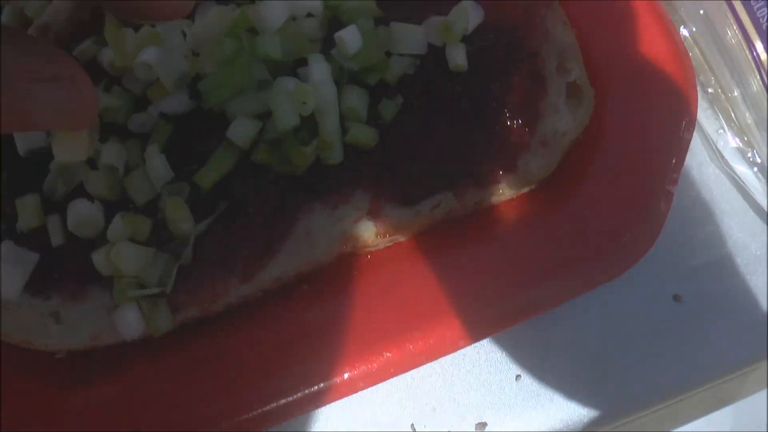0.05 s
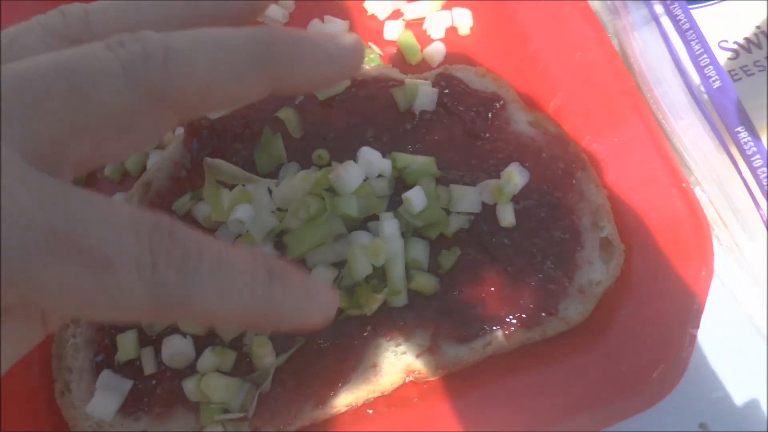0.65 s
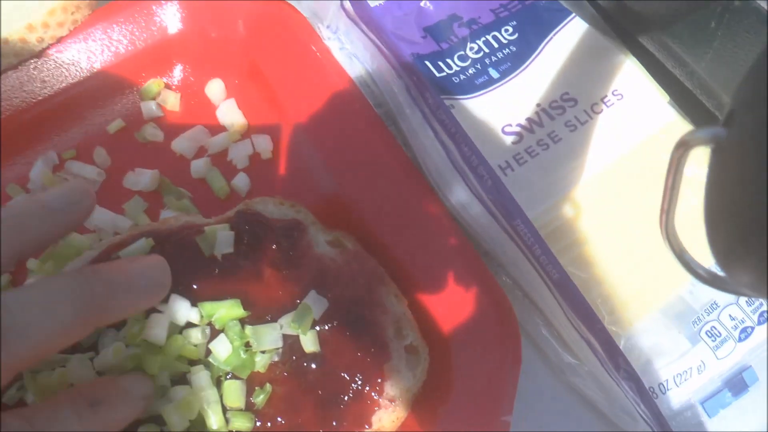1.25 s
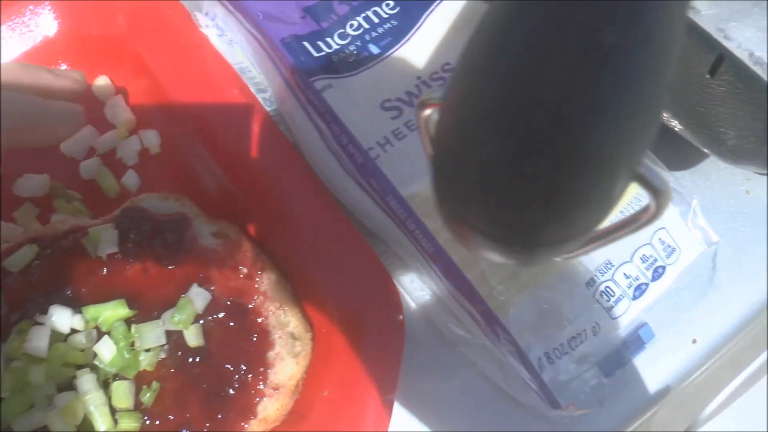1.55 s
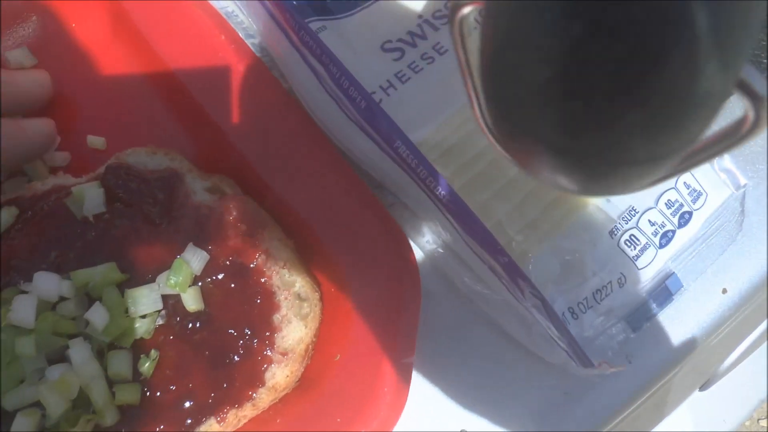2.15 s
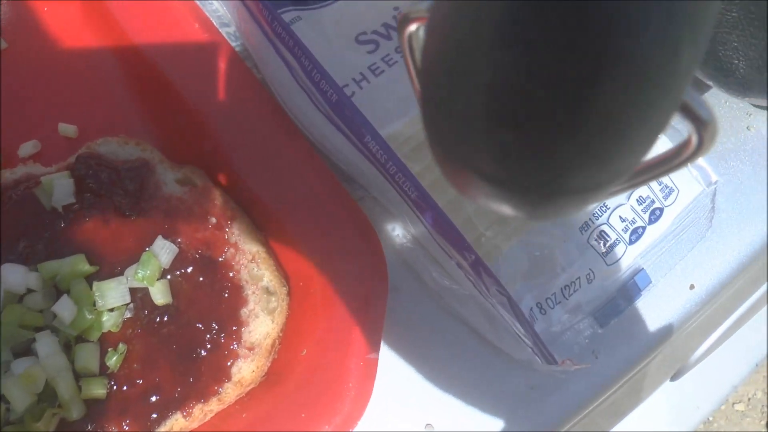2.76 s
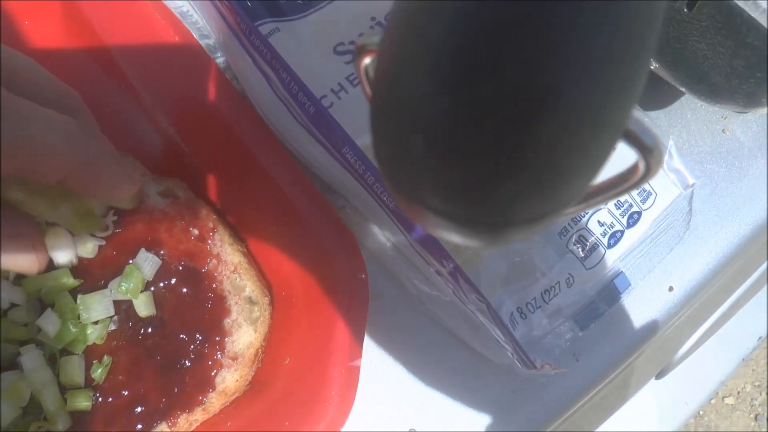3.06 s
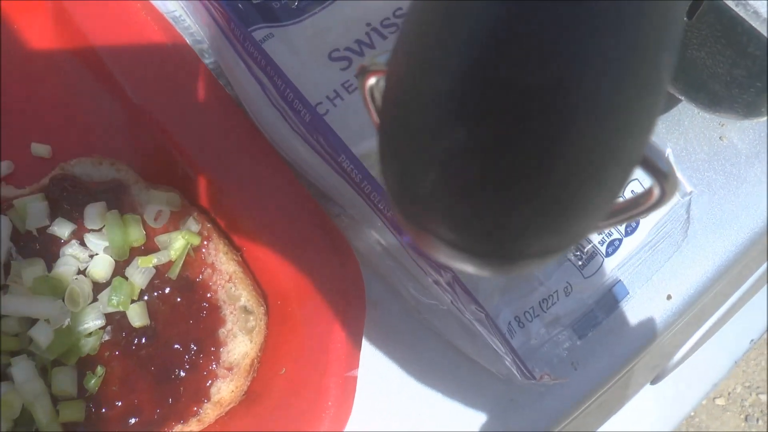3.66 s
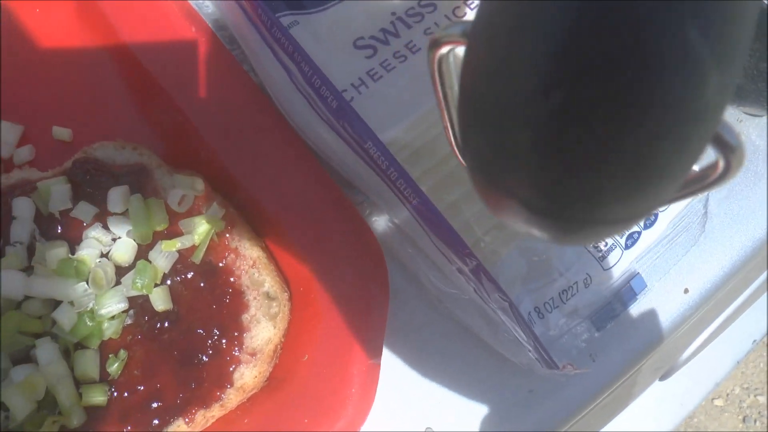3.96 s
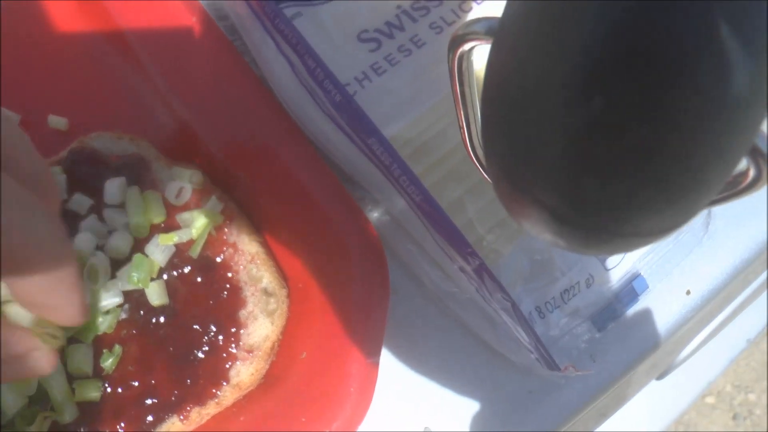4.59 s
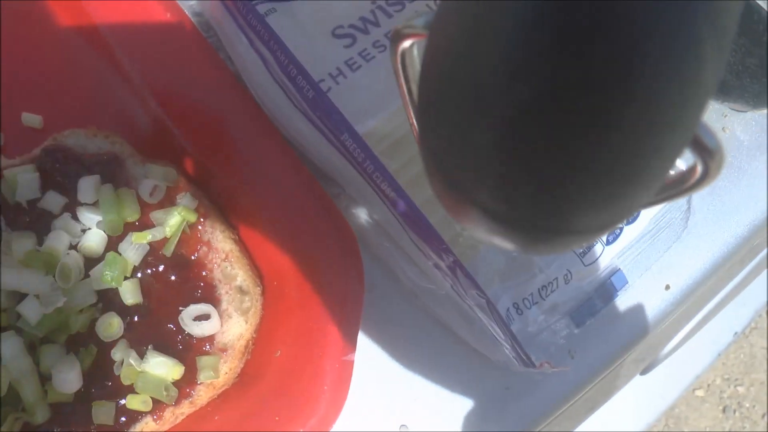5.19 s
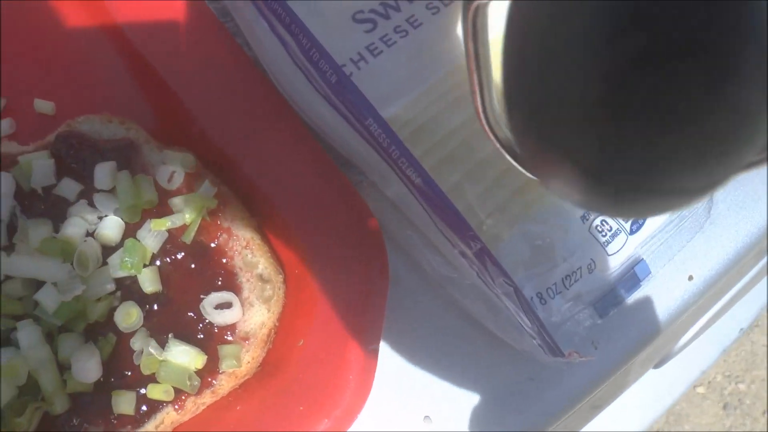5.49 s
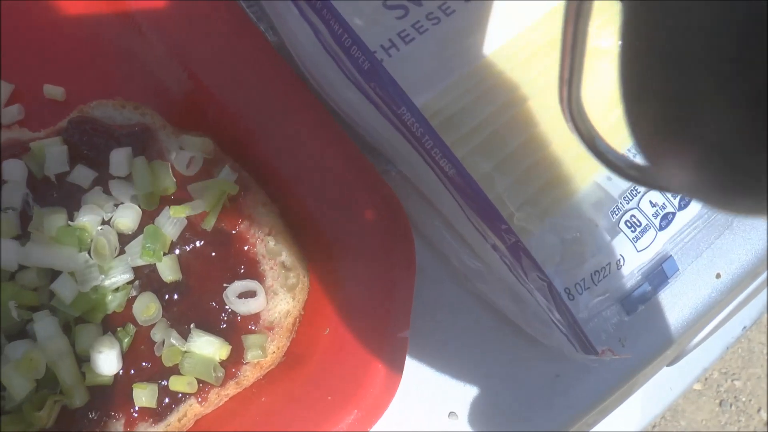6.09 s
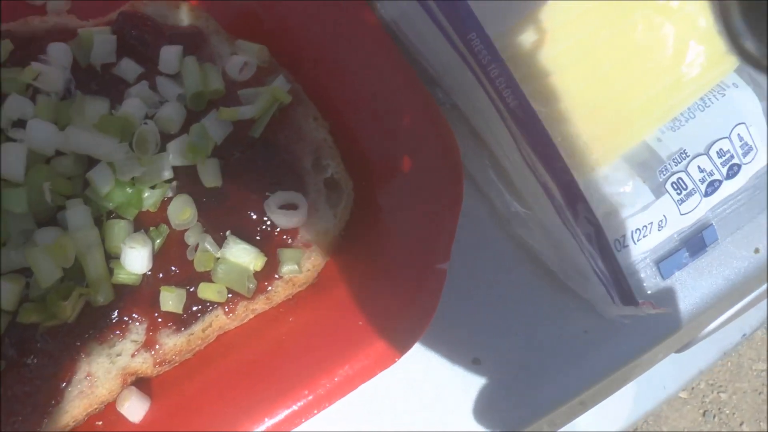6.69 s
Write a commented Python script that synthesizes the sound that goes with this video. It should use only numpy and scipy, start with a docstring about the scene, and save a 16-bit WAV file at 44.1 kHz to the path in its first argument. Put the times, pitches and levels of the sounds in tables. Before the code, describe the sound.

Quiet open air with far insects and a few tiny ticks comes first. Then a hand, near and a little to the left, gathers chopped green onions on a plastic board: brief moist scrapes, clicking pieces and low knocks against the table. A softer second handful follows, then a firmer third that finishes with a sharp snap of onion. A slight breeze brushes the microphone now and then, and the outdoor hush remains.

```python
"""A low outdoor murmur comes first, with a thin buzz of insects far off and a few light ticks up close.
Then, near the microphone and a little left, fingers sweep chopped green onions across a plastic cutting
board and drop them on a slice of bread. Each stroke is a gritty rub with small crunches and moist pops;
crisp pieces tick and snap, and the hand bumps the board on its table. Faint puffs of breeze touch the
microphone, and nearby reflections give everything a slightly hollow colour."""
import sys
import numpy as np
from scipy import signal
from scipy.fft import rfft, irfft, next_fast_len
from scipy.io import wavfile
from scipy.ndimage import uniform_filter1d, map_coordinates

SR = 44100
rng = np.random.default_rng(int(sys.argv[2]) if len(sys.argv) > 2 else 0)


def put_to_file(sound):
    """Save the sound as 16-bit audio at rate SR, in the file named by the first command-line argument."""
    columns = np.atleast_2d(sound).T  # one column per channel
    safe = np.clip(columns, -1, 1)
    whole_steps = np.round(safe * 32767)
    wavfile.write(sys.argv[1], SR, whole_steps.astype(np.int16))


N = 305965
TIME = np.arange(N) / SR

# Table levels are relative: the functions add their own gains.
# Murmur and hiss of the open air: (frequency [Hz], level [dB])
AIR_SPECTRUM = [(25, -10), (60, -10.5), (100, -3.5), (185, -1), (290, -4.5), (400, -7.5), (600, -14.5),
                (1100, -19.5), (1500, -18), (2200, -14), (3000, -16), (5700, -20.5), (6400, -24),
                (8000, -29.5), (9400, -24), (15000, -33.5)]
# Its slow rise and fall: (time [s], level [dB])
AIR_LEVELS = [(0, -63), (.7, -63.5), (1.3, -61.5), (5.8, -60), (6.5, -63.5)]
# Far insects: (frequency [Hz], width [Hz], level [dB])
INSECT_BANDS = [(3840, 210, -0.5), (4180, 200, 2.5), (5080, 130, -12), (5390, 140, -8)]
# Strength of their buzz: (time [s], level [dB])
INSECT_LEVELS = [(0, -69.5), (.6, -71), (1.05, -66.5), (3, -67), (4.7, -66.5), (6.0, -66.5), (6.9, -68.5)]
# Outdoor sound across the two microphone ports: (frequency [Hz], left-right likeness [0-1])
PORT_LIKENESS = [(25, 0.18), (70, 0.93), (300, 0.69), (2000, 0.98), (12000, 1)]
# Breeze on the microphone: (time [s], level [dB], half-length [s])
BREEZE_PUFFS = [(2.543, -55, 0.034), (2.696, -55, 0.027), (4.687, -58, 0.089), (4.99, -60, 0.071)]
# Its rumble: (frequency [Hz], level [dB])
BREEZE_SPECTRUM = [(20, -9.0), (80, 8.0), (140, -4.5), (300, -41.0)]
# Left-right difference scattered by nearby things: (frequency [Hz], level [dB])
SCATTER_SPECTRUM = [(100, -22), (400, -15.5), (1000, -17), (3000, -20.5), (8000, -14.5), (13000, -56)]
# Where the hand works before the microphone: (time [s], leftward lean [dB])
HAND_LEAN = [(1.7, 1.5), (2.4, 2), (3.2, 0), (4.1, 1.5), (5.4, 2.5), (5.9, 2)]
# Shadowing between the ports: (frequency [Hz], weight of the lean [factor])
PORT_SHADOW = [(250, 0), (600, 1.1), (1200, 1.6), (2500, 1.2), (5000, 0.69), (13000, 0)]
# Soft bumps of the hand: (time [s], sway level [dB], sway pitch [Hz], thud level [dB])
HAND_BUMPS = [(1.673, -42.5, 129, -50.5), (2.33, -45, 122, -62), (2.452, -41, 114, -46.5),
              (2.629, -47.5, 139, -56), (3.758, -39, 118, -42), (3.895, -38, 115, -63),
              (3.986, -41, 111, -56), (4.019, -49, 110, -59), (4.045, -40, 113, -59),
              (4.092, -39.5, 117, -46.5), (4.641, -46.5, 109, -70), (5.3281, -47, 138, -36.5),
              (5.356, -45, 120, -48), (5.433, -48, 149, -38.5), (5.479, -47, 115, -55),
              (5.708, -44, 113, -59), (5.733, -51, 130, -48), (6.585, -55, 139, -64)]
# The table under the rocking board: (frequency [Hz], level [dB])
TABLE_SPECTRUM = [(20, -28), (70, -18.5), (115, -4), (170, -10), (280, -23), (600, -40)]
# Pieces and fingertips meeting the board:
# (time [s], click level [dB], click pitch [Hz], knock level [dB], moist edge level [dB], edge pitch [Hz])
BOARD_TICKS = [(0.3783, -62, 2280, -67, -78, 5400), (1.2463, -56.5, 2540, -68, -62, 10800),
               (1.2642, -57, 2550, -78, -78, 10300), (1.6712, -31.5, 2000, -38.5, -40, 7100),
               (1.6768, -35.5, 2200, -47, -40, 7860), (1.681, -51, 2120, -50, -50, 7600),
               (1.6873, -36, 3400, -45, -46, 10000), (1.7249, -38, 3400, -46, -46, 9100),
               (1.7462, -44, 1830, -51, -78, 5400), (1.7648, -40, 1750, -61, -40, 5800),
               (1.8289, -43, 2790, -65, -52, 8800), (1.9616, -61, 1840, -78, -60, 7900),
               (2.0288, -54, 1840, -77, -55.5, 8100), (2.0428, -49, 1980, -43.5, -69, 5400),
               (2.2071, -51, 3920, -78, -51, 8800), (2.2153, -49, 3630, -58, -47, 8050),
               (2.2276, -45.5, 2150, -49, -48, 7800), (2.286, -58, 4190, -49, -50, 8200),
               (2.3337, -43, 2100, -52, -55, 6100), (2.3403, -44, 3010, -49, -63, 8100),
               (2.3926, -53, 1540, -43, -54, 8200), (2.4224, -41, 1940, -45, -46, 6100),
               (2.4539, -49, 1870, -48, -57, 5800), (2.4824, -45.5, 1720, -43, -49, 8700),
               (2.5752, -55, 1530, -45.5, -61, 7300), (2.6081, -53, 3160, -64, -55.5, 10900),
               (2.635, -53, 2010, -47.5, -52.5, 7100), (2.6822, -49, 3200, -52, -78, 5400),
               (2.726, -59, 2860, -49.5, -58, 10000), (2.7428, -55, 3060, -53, -72, 10900),
               (2.78, -49, 2460, -50, -49, 6700), (2.7934, -73, 2720, -47, -65, 6400),
               (2.8101, -59, 3980, -57, -78, 5400), (2.8975, -69, 3140, -78, -60, 8900),
               (3.0912, -51.5, 2170, -78, -60.5, 11100), (3.1186, -59, 2160, -64, -73, 5400),
               (3.1914, -51.5, 2120, -53, -66, 7700), (3.2144, -57.5, 2260, -55, -74, 12000),
               (3.3269, -54, 2280, -48, -74, 10600), (3.3604, -49, 2450, -45.5, -68, 10800),
               (3.4456, -71, 4200, -78, -64, 7600), (3.4942, -60, 4100, -66, -61, 8100),
               (3.5131, -48.5, 2090, -43.5, -65, 7600), (3.6997, -65, 1960, -45.5, -76, 5400),
               (3.7193, -44, 2390, -41, -77, 10200), (3.7581, -41.5, 3100, -41, -44.5, 8000),
               (3.7601, -44.5, 3140, -35, -50, 9400), (3.7693, -56, 1470, -39.5, -78, 12000),
               (3.7957, -52, 2650, -59, -58, 9400), (3.8373, -55, 3370, -37.5, -64, 11100),
               (3.8639, -52, 2080, -43.5, -60, 6000), (3.8948, -48.5, 2440, -48, -46, 8300),
               (3.9043, -51.5, 2210, -49, -51, 8000), (3.9615, -54, 2950, -63, -54, 8400),
               (4.0242, -45, 3710, -61, -44, 10400), (4.0366, -51, 4200, -78, -50, 8900),
               (4.0531, -56, 1360, -53, -53, 10500), (4.0689, -52, 1980, -59, -38.5, 8600),
               (4.0903, -49.5, 1740, -46, -60, 5900), (4.2358, -53.5, 3460, -43, -63, 9000),
               (4.3708, -51.5, 1990, -48.5, -74, 11100), (4.6027, -57, 3580, -73, -68, 10500),
               (4.9749, -43.5, 2880, -48.5, -64, 11300), (5.0178, -54, 2330, -51.5, -71, 6700),
               (5.0544, -53, 2300, -62, -78, 12000), (5.3301, -40.5, 2270, -31, -47, 7900),
               (5.3486, -49, 1800, -72, -63, 5400), (5.356, -40, 2900, -35, -51, 8500),
               (5.3767, -44, 2790, -52, -51.5, 8400), (5.5017, -41, 1790, -37, -49, 7100),
               (5.5102, -37.5, 2210, -50, -53, 8300), (5.589, -42, 2960, -52, -37.5, 6300),
               (5.66, -40.5, 3780, -51, -45.5, 8200), (5.7096, -43, 3780, -45, -48, 9400),
               (5.8134, -39.5, 3820, -42, -48, 12000), (5.8862, -50, 3010, -62, -67, 9700),
               (6.06, -60.5, 2030, -58, -67, 11600)]
# The last pieces snap clear of the fingers: (time [s], level [dB], pitch [Hz])
ONION_SNAPS = [(5.8282, -22, 4000), (5.8335, -17.5, 5250), (5.8338, -18, 3380), (5.8436, -17, 3090)]
# Fingers rest on a handful and drag it lightly:
# (start [s], length [s], settling time [s], drag level [dB], board rocking level [dB])
HANDFUL_DRAGS = [(1.655, 0.29, 0.006, -57.5, -57.5), (1.964, 0.041, 0.032, -64, -59),
                 (2.012, 0.5, 0.04, -64, -59), (2.525, 0.28, 0.07, -69, -62), (3.112, 0.32, 0.08, -80, -73),
                 (3.704, 0.5, 0.06, -67.5, -55), (4.22, 0.17, 0.061, -74, -61.5),
                 (5.383, 0.28, 0.044, -57.5, -56.5), (5.698, 0.17, 0.048, -59.5, -61)]
# Single pushes of the fingers: (start [s], length [s], build-up [s], rub level [dB],
# board pressure level [dB], wet fizz level [dB], hollow ring level [dB], ring pitch [Hz])
FINGER_PUSHES = [(1.668, 0.029, 0.003, -48, -58, -50.5, -48.5, 2160),
                 (1.705, 0.052, 0.0071, -46.5, -61, -52, -52, 1920),
                 (1.766, 0.14, 0.035, -49.5, -57.5, -51, -49.5, 2170),
                 (1.9, 0.025, 0.0046, -57, -53, -53, -55, 2110),
                 (1.929, 0.026, .004, -54.5, -54, -62, -62, 2110),
                 (2.052, 0.14, 0.061, -55, -61.5, -62, -52, 2270),
                 (2.211, 0.069, 0.013, -54, -59.5, -59.5, -56, 1910),
                 (2.274, 0.093, 0.024, -48.5, -55, -55, -49.5, 1970),
                 (2.32, 0.05, 0.013, -62, -62, -72, -49.5, 1110),
                 (2.366, 0.069, 0.046, -48, -52, -47.5, -61, 1810),
                 (2.439, 0.03, 0.0064, -48.5, -52, -55.5, -59, 1880),
                 (2.51, 0.042, 0.0092, -61.5, -66, -65, -75, 1690),
                 (2.66, 0.062, 0.014, -69, -66, -65, -74, 2000),
                 (3.777, 0.065, 0.02, -65, -59.5, -72, -66, 2500),
                 (3.872, 0.037, .016, -63, -54, -61, -61, 1760),
                 (3.938, 0.065, 0.019, -58, -61, -58, -75, 1810),
                 (4.01, 0.087, 0.012, -53.5, -53, -54.5, -63, 1600),
                 (4.114, 0.066, 0.029, -53.5, -54.5, -58, -56, 2200),
                 (4.25, .037, 0.013, -60.5, -61.5, -69, -76, 1800),
                 (5.399, 0.047, 0.038, -49.5, -48.5, -64, -56, 2300),
                 (5.434, 0.056, 0.0034, -44, -45.5, -54.5, -56, 2120),
                 (5.484, 0.031, 0.013, -41.5, -38.5, -53, -40.5, 1780),
                 (5.521, 0.033, 0.013, -51, -48, -55.5, -54, 1700),
                 (5.564, 0.059, 0.0087, -45.5, -48, -50, -51, 2360),
                 (5.646, 0.021, 0.0091, -54.5, -65, -63, -59, 2100),
                 (5.695, 0.04, 0.013, -51, -51, -52.5, -57, 2000),
                 (5.757, 0.11, 0.018, -63, -61, -70, -58, 2100),
                 (5.816, .035, 0.014, -55, -62, -43.5, -53, 2020)]
# Onion rubbing on plastic: (frequency [Hz], level [dB])
RUB_SPECTRUM = [(800, -26.5), (1300, 0.5), (1800, 1), (2300, -1), (3200, 4), (4300, -3.5), (5500, -8),
                (7500, -18), (12000, -37)]
# The board under pressure: (frequency [Hz], level [dB])
BOARD_SPECTRUM = [(40, -65), (100, -28), (250, 3.5), (700, -1), (1350, 2.5), (1900, -11.5), (4000, -43.5)]
# Wet fizz of the onion: (frequency [Hz], level [dB])
FIZZ_SPECTRUM = [(3240, -7.5), (5500, -1.5), (7590, -3), (8330, -4), (9700, 0), (14700, -13.5),
                 (16000, -30)]
# Narrow peaks and dips from nearby reflections: (frequency [Hz], width [Hz], gain [dB])
REFLECTION_BANDS = [(495, 61, -12), (584, 25, 1), (641, 78, -9), (708, 488, 8), (781, 14, 2),
                    (924, 140, -8.5), (1098, 22, 5), (1153, 24, -4), (1243, 30, 4.5), (1267, 59, -8),
                    (1432, 68, 4.5), (1542, 98, -5.5), (1694, 26, 3.5), (1793, 380, 5.5), (2903, 30, -11),
                    (2900, 45, 2), (3360, 37, 1.5), (5960, 47, 4), (8550, 380, -1)]

DRAG_ATTACK_S, PUSH_RELEASE_S = 0.02, 0.007  # a push stops short as the fingers lift
THUD_HZ, THUD_T60_S = 240, 0.019  # the board's own answer to a bump
HOLLOW_Q = 4.5
BOARD_TOP_HZ, BAND_LIMIT_HZ = 5060, 15900


def amp(db):
    """Decibels to gain."""
    return 10 ** (np.asarray(db) / 20)


def unit(x):
    """Scale to rms 1."""
    return x / np.sqrt(np.mean(x ** 2) + 1e-20)


def along(points, hz):
    """Interpolate (frequency [Hz], value) points on a log axis."""
    f, v = np.transpose(points)
    return np.interp(np.log(hz + 1), np.log(f + 1), v)


def timeline(points):
    """Interpolate (time [s], value) points over the scene."""
    return np.interp(TIME, *np.transpose(points))


def wobble(per_s):
    """A smooth random curve with this many knots a second."""
    return map_coordinates(rng.standard_normal(int(N * per_s / SR) + 4), [TIME * per_s])


def held(start, length, attack, release):
    """Straight attack, hold and exponential release, in seconds."""
    fade = np.exp(-np.maximum(TIME - start - length, 0) / release)
    return np.clip((TIME - start) / attack, 0, 1) * fade


def add(track, start, sound):
    """Mix a sound in at a time in seconds."""
    part = track[round(start * SR):][:len(sound)]
    part += sound[:len(part)]


def filtered(x, response):
    """Pass x through a complex frequency response."""
    size = x.shape[-1]
    padded = next_fast_len(size + 8192)
    return irfft(rfft(x, padded) * response(np.fft.rfftfreq(padded, 1 / SR)), padded)[..., :size]


def minimum_phase(db):
    """The causal response that has these levels."""
    cepstrum = irfft(np.log(amp(db)))
    half = len(cepstrum) // 2
    cepstrum[1:half] *= 2
    cepstrum[half + 1:] = 0
    return np.exp(rfft(cepstrum))


def coloured(x, spectrum):
    """Shape x with a spectrum table; rms 1."""
    return unit(filtered(x, lambda hz: minimum_phase(np.maximum(along(spectrum, hz), -80))))


def resonance(f, centre, width):
    """One damped mode."""
    return 1j * f * width / (centre ** 2 - f ** 2 + 1j * f * width)


def wide(pair):
    """Two unrelated signals become a left and right that are mostly alike; rms 1."""
    angle = lambda hz: np.arccos(np.clip(along(PORT_LIKENESS, hz), -1, 1)) / 2
    mid, side = filtered(pair, lambda hz: np.array([np.cos(angle(hz)), np.sin(angle(hz))]))
    return unit(np.array([mid + side, mid - side]))


def patchy(x, depth_db):
    """Small patches of the spectrum swell and fade on their own."""
    frames = signal.stft(x, nperseg=512)[2]
    patches = uniform_filter1d(rng.standard_normal(frames.shape[1:]), size=3, axis=0)
    patches = uniform_filter1d(patches, size=30, axis=1)
    return signal.istft(frames * amp(depth_db * unit(patches)), nperseg=512)[1][:, :N]


def outdoor_air():
    """A low murmur and hiss all around the microphone, barely swelling."""
    murmur = patchy(coloured(rng.standard_normal((2, N)), AIR_SPECTRUM), depth_db=1.7)
    return wide(murmur) * amp(timeline(AIR_LEVELS) + 0.5 * wobble(per_s=1.64))


def far_insects():
    """A distant chorus: narrow bands of noise make a thin, wavering buzz."""
    bands = lambda f: sum(amp(db) * abs(resonance(f, hz, width)) ** 2 for hz, width, db in INSECT_BANDS)
    chorus = filtered(rng.standard_normal((2, N)), bands)
    return wide(chorus) * amp(timeline(INSECT_LEVELS) + 1.7 * wobble(per_s=25))


def breeze():
    """Short low puffs right on the microphone, a little different at its two ports."""
    puffs = sum(amp(db) * np.exp(-((TIME - time) / span) ** 2) for time, db, span in BREEZE_PUFFS)
    return puffs * wide(coloured(rng.standard_normal((2, N)), BREEZE_SPECTRUM))


def nearby_scatter(close):
    """Things near the board return brief echoes, heard as a faint left-right difference."""
    t = np.arange(SR // 20) / SR
    echoes = rng.standard_normal(len(t)) * amp(-60 * t / 0.041) * (1 - np.exp(-t / 0.00065))
    scattered = signal.fftconvolve(close.mean(axis=0), echoes / np.linalg.norm(echoes))[:N]
    return filtered(scattered, lambda f: amp(along(SCATTER_SPECTRUM, f)))


def leftward_lean(hand):
    """The side signal of a hand left of the microphone: the far port lies in shadow."""
    balance = np.tanh(np.log(amp(timeline(HAND_LEAN))) / 2)
    return balance * filtered(hand.mean(axis=0), lambda f: along(PORT_SHADOW, f))


def board_bumps(rocking):
    """Board and table answer the hand with a low damped sway and a shorter thud; rocking rumbles."""
    out, t = np.zeros(N), np.arange(SR // 5) / SR
    for start, sway_db, hz, thud_db in HAND_BUMPS:
        sway = np.sin(2 * np.pi * hz * t) * amp(-60 * t / 0.047) * (1 - np.exp(-t / 0.0053)) ** 2
        thud = np.sin(2 * np.pi * THUD_HZ * t) * amp(-60 * t / THUD_T60_S)
        thud *= (1 - np.exp(-t / 0.0023)) ** 2
        add(out, start, amp(sway_db + 16.5) * sway + amp(thud_db + 20) * thud)
    return out + rocking * coloured(rng.standard_normal(N), TABLE_SPECTRUM)


def contact(hz, q, tail_db, tail_t60, dispersion=2):
    """A tap rings two close damped modes and scatters through the board; rms 1 over its first 4 ms."""
    t = np.arange(SR // 6) / SR
    tap = amp(tail_db - 60 * t / tail_t60) * rng.standard_normal(len(t)) * (1 - np.exp(-t / 0.00011))
    tap[0] = 1
    modes = lambda f: resonance(f, hz * 0.91, hz / q) * resonance(f, hz * 0.99, hz / q)
    # The contact time cuts what lies an octave above; slow bending waves arrive later.
    soft = lambda f: 1 / (1 + 1.2j * f / (2 * hz) - (f / (2 * hz)) ** 2)
    bending = lambda f: (1 - 2 * resonance(f, hz * 1.064, hz * 1.19)) ** dispersion
    ring = filtered(tap, lambda f: modes(f) * soft(f) * bending(f))
    return ring / np.sqrt(np.mean(ring[:SR // 250] ** 2))


def board_ticks():
    """Pieces and fingertips hit the board: a click, a higher mode, a hollow knock and a moist edge."""
    board, edges = np.zeros((2, N))
    for start, click_db, hz, knock_db, edge_db, edge_hz in BOARD_TICKS:
        tail_db = -25.5 + 0.18 * (click_db + 50)  # harder clicks rattle the board more
        click = contact(hz, q=1.86, tail_db=tail_db, tail_t60=0.063)
        click += amp(-4.5) * contact(1.795 * hz, q=1.9, tail_db=tail_db, tail_t60=0.034)
        knock = contact(hz=619, q=0.44, tail_db=tail_db + 1.0, tail_t60=0.058)
        add(board, start, amp(click_db - 0.9) * click + amp(knock_db - 6.5) * knock)
        add(edges, start, amp(edge_db - 0.3) * contact(edge_hz, q=1.9, tail_db=-20, tail_t60=0.02))
    return signal.sosfilt(signal.butter(6, BOARD_TOP_HZ, fs=SR, output="sos"), board) + edges


def onion_snaps():
    """Crisp pieces crack and briefly rattle the board; the highest glint differs at each port."""
    out = np.zeros((2, N))
    for start, db, hz in ONION_SNAPS:
        crack = contact(hz, q=2.0, tail_db=-31.5, tail_t60=0.075, dispersion=4)
        knock = amp(-12) * contact(hz=1000, q=0.09, tail_db=-27, tail_t60=0.07)
        edge = amp(-11.5) * contact(hz=9500, q=1.9, tail_db=-19, tail_t60=0.01, dispersion=8)
        for channel in out:
            glint = amp(-15) * contact(hz=12700, q=3, tail_db=8, tail_t60=0.0076, dispersion=8)
            add(channel, start, amp(db - 8.5) * (crack + knock + edge + glint))
    return out


def grit(per_s, spread_db, smooth):
    """Tiny slips of very unequal size on a bed of smooth friction."""
    slips = (rng.random(N) < per_s / SR) * rng.choice([-1, 1], N)
    sizes = amp(spread_db * np.minimum(rng.standard_normal(N), 2))
    return unit(slips * sizes) + smooth * rng.standard_normal(N)


def pops(hz, octaves, cycles, spread_db, count):
    """Tiny damped rings at random moments, each with its own pitch and size; rms 1."""
    t = np.arange(SR // 200) / SR
    starts = rng.integers(0, N, count)
    pitch, size = np.clip(rng.standard_normal((2, count, 1)), -2, 2)
    turns = np.minimum(hz * 2 ** (octaves * pitch), BAND_LIMIT_HZ) * t
    rings = amp(spread_db * size) * np.sin(2 * np.pi * turns)
    rings *= np.exp(-turns / cycles) * (1 - np.exp(-turns))
    samples = starts[:, None] + np.arange(len(t))
    return unit(np.bincount(samples.ravel(), rings.ravel(), N)[:N])


def hand_hollow():
    """The gap between hand and board rings with the rub, at a pitch that changes from push to push."""
    out, slips = np.zeros(N), grit(per_s=1100, spread_db=4.5, smooth=0.5)
    for start, length, attack, _, _, _, db, hz in FINGER_PUSHES:
        part = slice(round(start * SR), round(start * SR) + SR // 3)
        ring = filtered(slips[part], lambda f: resonance(f, hz, hz / HOLLOW_Q) * resonance(f, hz, hz))
        out[part] += amp(db) * unit(ring) * held(start, length, attack, PUSH_RELEASE_S)[part]
    return out


def hand_reflection(x, lag_ms, sway_ms, share):
    """Add a bounce off the moving hand: its path changes, so hollow bands drift through the rub."""
    lag = (lag_ms + sway_ms * wobble(per_s=5)) * SR / 1000
    return (x + share * map_coordinates(x, [np.arange(N) - lag])) / np.sqrt(1 + share ** 2)


def finger_effort():
    """Gains of rub, board pressure, fizz and rocking: a light drag per handful, with pushes on top."""
    power = np.zeros((4, N))
    for start, length, settle, drag_db, rock_db in HANDFUL_DRAGS:
        gains = amp([drag_db, drag_db - 1, drag_db - 5.5, rock_db])
        power += np.outer(gains, held(start, length, DRAG_ATTACK_S, settle)) ** 2
    for start, length, attack, rub_db, board_db, fizz_db, _, _ in FINGER_PUSHES:
        gains = amp([rub_db, board_db, fizz_db, board_db - 7])
        power += np.outer(gains, held(start, length, attack, PUSH_RELEASE_S)) ** 2
    return np.sqrt(power)


def onion_strokes(rub, pressure, fizz):
    """Pieces slip, crunch and burst moist cells under the fingers; pressing brings out the board."""
    catching = amp(0.99 * wobble(per_s=90))
    slips = grit(per_s=4000, spread_db=3.0, smooth=0.72) * catching
    wet_slips = grit(per_s=5000, spread_db=4.5, smooth=0.52) * catching
    crunch = amp(-5.5) * pops(hz=2400, octaves=0.4, cycles=2.6, spread_db=4.5, count=750)
    bursts = amp(-3) * pops(hz=8000, octaves=0.33, cycles=2.4, spread_db=4.5, count=4000)
    scrape = amp(2.0) * rub * (coloured(slips, RUB_SPECTRUM) + crunch)
    board = amp(0.56) * pressure * coloured(slips, BOARD_SPECTRUM)
    moisture = amp(1.44) * fizz * (coloured(wet_slips, FIZZ_SPECTRUM) + bursts)
    return scrape + board + moisture


def scene():
    """The hand works close to the microphone, a little left, with open air and far insects behind."""
    rub, pressure, fizz, rocking = finger_effort()
    sweep = hand_reflection(onion_strokes(rub, pressure, fizz), lag_ms=1.617, sway_ms=0.151, share=0.31)
    hand = sweep + hand_hollow() + board_ticks() + onion_snaps()
    close = hand + board_bumps(rocking)
    side = leftward_lean(hand) + nearby_scatter(close)
    return close + np.array([side, -side]) + breeze() + outdoor_air() + far_insects()


def record(dry):
    """Nearby reflections leave steady peaks and dips at the microphone; the highest treble is cut."""
    ripple_db = lambda f: sum(db / (1 + (2 * (f - hz) / width) ** 2)
                              for hz, width, db in REFLECTION_BANDS)
    return filtered(dry, lambda f: minimum_phase(ripple_db(f)) * (f < BAND_LIMIT_HZ))


dry = scene()
out = record(dry)
put_to_file(out)
```